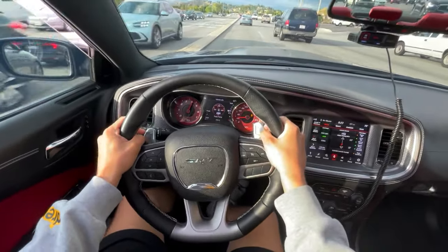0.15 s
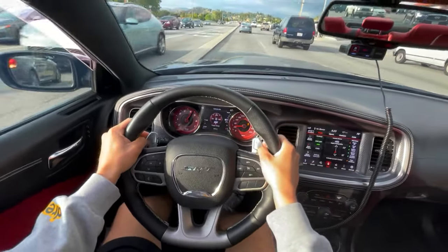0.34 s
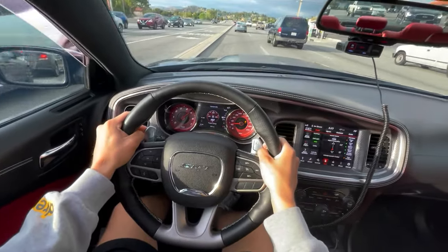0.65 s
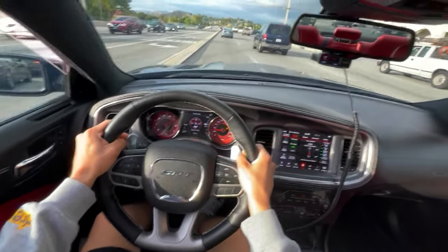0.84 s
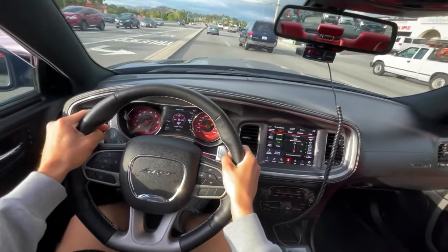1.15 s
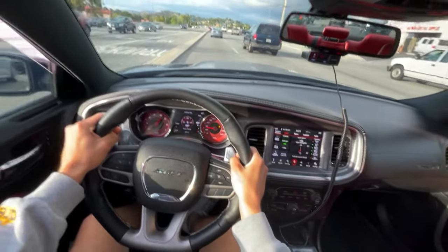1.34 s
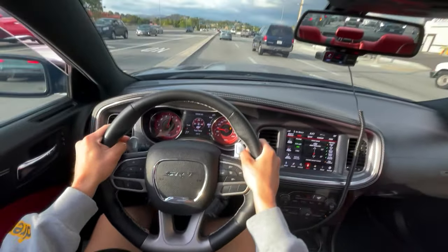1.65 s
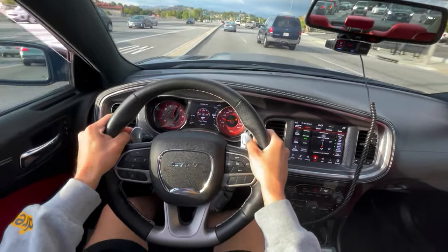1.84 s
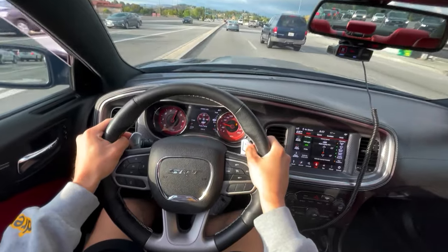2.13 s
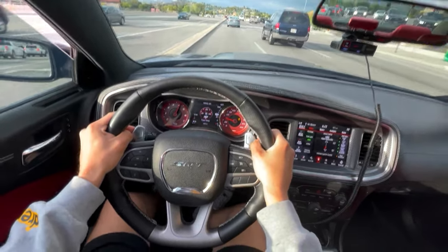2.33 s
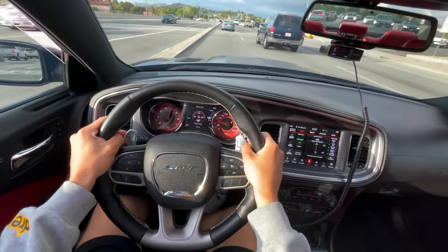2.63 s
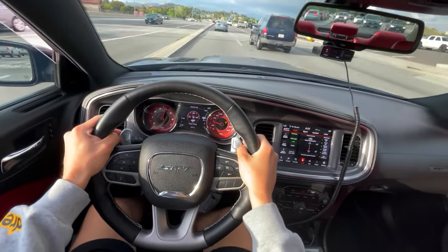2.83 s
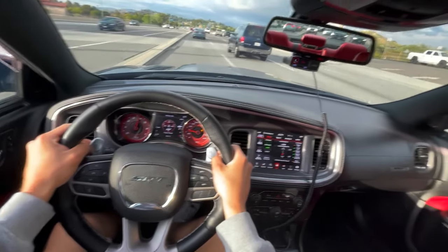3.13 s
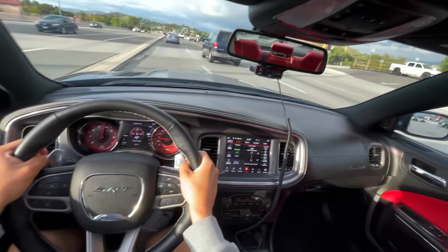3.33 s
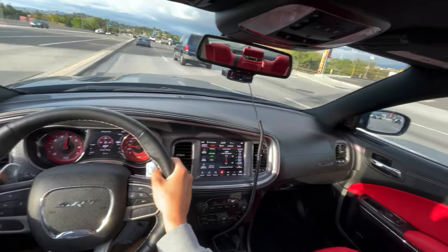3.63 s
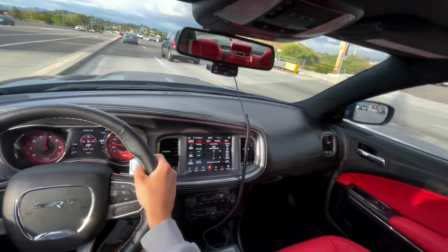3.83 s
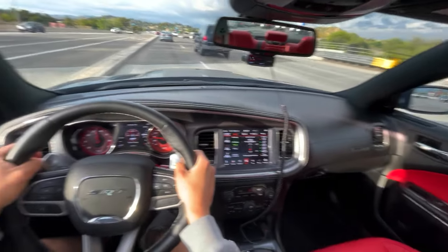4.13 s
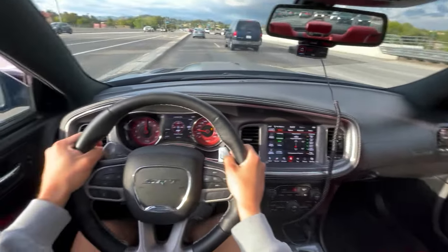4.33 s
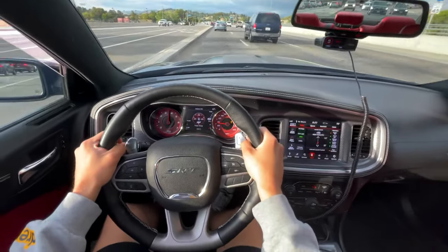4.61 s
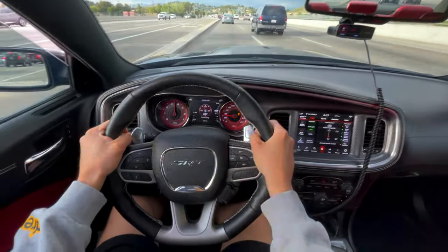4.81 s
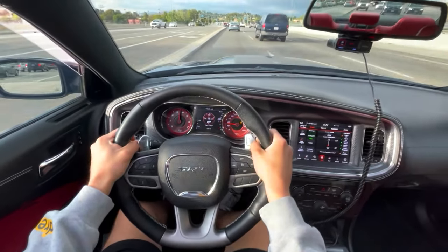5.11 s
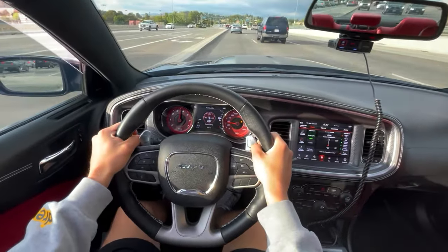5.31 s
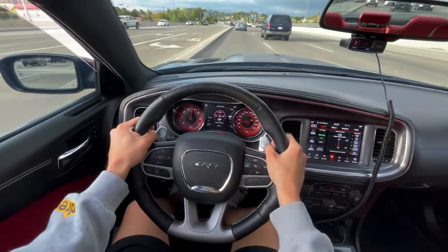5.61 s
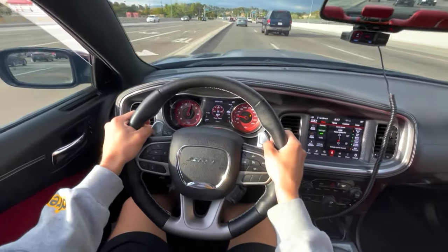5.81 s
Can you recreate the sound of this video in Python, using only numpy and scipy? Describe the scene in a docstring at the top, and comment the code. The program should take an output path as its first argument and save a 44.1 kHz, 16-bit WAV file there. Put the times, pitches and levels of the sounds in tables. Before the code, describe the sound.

In a closed car cabin, with a stereo microphone near the driver, a supercharged V8 is already pulling hard. From 0 to about 1.05 s its coarse, uneven exhaust snarl rises in pitch, with turbulent rasp, hiss and a singing blower whine; a short hollow intake howl swells near 0.9 s. At about 1.2 s the upshift brings a deep thump and spitting bark, and engine and whine slide down until about 1.45 s. The pull resumes briefly, peaking near 1.75 s, then whine and rasp fade away by 2 s. From 2 to 4.6 s a low light-throttle drone slowly sinks over tyre rumble and faint wind, with dull bumps around 2.1-2.3 and 4.2-4.3 s. A heavier jolt comes at 4.7 s. At 5 s there is a dull knock; growl, rasp and a prominent piercing whine build and climb to the end, with tiny trim ticks.

```python
"""A snarling full-throttle pull inside a supercharged V8 saloon, then an upshift with an exhaust bark,
a light-throttle cruise over a few bumps, and a second pull. The exhaust is a harmonic series on the
engine cycle; the blower whines through duct resonances at a fixed multiple of that cycle, except just
after the upshift, when its rotors run at their own speed. Filtered noise gives the gas flow, tyres,
wind and door seals; bumps are short bursts of low tone. A cabin field sets left against right."""
import sys
import numpy as np
from scipy import signal
from scipy.fft import rfft, irfft, next_fast_len
from scipy.io import wavfile

SR = 44100
rng = np.random.default_rng(int(sys.argv[2]) if len(sys.argv) > 2 else 0)


def generate_wav(signal):
    """Clip the signal to [-1, 1] and save it as 16-bit WAV at the path in sys.argv[1]."""
    frames = np.transpose(np.atleast_2d(signal))
    scaled = np.clip(frames, -1, 1) * 32767
    pcm = np.round(scaled).astype(np.int16)
    wavfile.write(sys.argv[1], SR, pcm)


N = 262831  # samples

# cabin field: (frequency [Hz], left leads by [rad], left minus right [dB], likeness of the sides [0-1])
CABIN_FIELD = [(30, 0.5, 2.5, 1), (135, 0.36, 1, 0.82), (175, 0.34, 4, 0.85), (218.5, -0.5, -5.5, 0.79),
               (248.9, 3.5, 5, 0.5), (299.4, -0.04, -1, 0.06), (366, 3.5, -8.5, 0), (406.5, 3, -4.5, 0.6),
               (431, 3.5, -3, 0.59), (487, 4.5, 6.5, 0.34), (520, 3.5, 0.5, 0.1), (578, 4, -2, 0.94),
               (635, 3, 1, 0.3), (697, 4, -1.5, 0.65), (766, 2.5, 7.5, 0.75), (888, 3, 1, 0.62),
               (896, 2.5, 4.5, 0.71), (1086, 3, 2, 0.87), (1203, 4, -4.5, 0.64), (1555, 4, 4.5, 0.69),
               (2130, 0.25, 2, 0.1), (2590, 5, 6, 0.2), (2856, 4, -5.5, 0.6), (2682, 7, -0.5, 0.8),
               (3420, 1.9, 3, 0.11), (4360, 0.5, -1, 0.3), (4630, -2, 0.5, 0.3), (5470, -2, -6, 0.6),
               (5460, -4.5, 6.5, 0.2), (6200, -5.5, -6.5, 0.6), (7400, -8.5, 1, 0.1), (8900, -7, -0.5, 1),
               (10800, -1.5, -1, 0.94)]
# spectrum of the rasping exhaust turbulence: (frequency [Hz], relative density [dB])
RASP_SPECTRUM = [(120, -26.5), (260, 11.5), (335, 3), (430, 13.5), (520, -12), (640, 1.5), (800, 10),
                 (1000, 0.5), (1300, -4), (1600, -8.5), (2100, -14.5), (2900, -16.5), (5000, -31),
                 (10000, -77)]
# spectrum of the hissing turbulence: (frequency [Hz], relative density [dB])
HISS_SPECTRUM = [(800, -32.5), (2000, -13), (3200, -3.5), (4400, -4.5), (5600, -2.5), (7200, -7.5),
                 (9000, -6.5), (10000, -11)]
SIDES = np.array([[.5], [-.5]])  # each side takes half of a left-right difference
REFERENCE_SPEED = 34  # engine cycles per s


def from_db(db):
    """Decibels are logarithmic: 20 dB is a tenfold amplitude gain."""
    return 10 ** (np.asarray(db) / 20)


def rms_one(x):
    """Normalise the mean power to 1."""
    return x / np.sqrt(np.mean(x ** 2) + 1e-20)


def in_time(rows):
    """Linear interpolation of each column of a time curve at every sample."""
    seconds, *columns = np.transpose(rows)
    t = np.arange(N) / SR
    return [np.interp(t, seconds, column) for column in columns]


def at_hz(rows, hz):
    """Interpolation of each column of a frequency table on a logarithmic pitch axis."""
    points, *columns = np.transpose(rows)
    log_hz = np.log(hz + 1e-9)
    return [np.interp(log_hz, np.log(points), column) for column in columns]


def drift(rate):
    """Low-passed noise of rms 1: a random modulator whose spectrum is halved in amplitude at rate [Hz]."""
    t = np.arange(0, N, 32) / SR
    size = 2 * len(t)
    hz = np.fft.rfftfreq(size, t[1])
    spectrum = rfft(rng.standard_normal(size)) / (1 + (hz / rate) ** 4)
    slow = irfft(spectrum)[:len(t)]
    return np.interp(np.arange(N) / SR, t, rms_one(slow))


def swell(centre, half_length):
    """Gaussian envelope of height 1; half_length [s] is its standard deviation."""
    distance = (np.arange(N) / SR - centre) / half_length
    return np.exp(-.5 * np.minimum(distance ** 2, 100))


def noise(colour, white=None):
    """Partly coherent stereo noise: a common row and two independent rows, coloured, with rms 1."""
    size = next_fast_len(N, True)
    hz = np.fft.rfftfreq(size, 1 / SR)
    lead, balance_db, alike = at_hz(CABIN_FIELD, hz)
    alike = np.clip(alike, 0, 1)
    white = rfft(rng.standard_normal((3, N)) if white is None else white, size)
    common = np.sqrt(alike) * white[0] * np.exp(1j * SIDES * lead)
    separate = np.sqrt(1 - alike) * white[1:]
    gain = from_db(at_hz(colour, hz)[0] + SIDES * balance_db)
    return rms_one(irfft((common + separate) * gain, size)[:, :N])


def partial(order, cycles, speed, extra_lead=0):
    """One harmonic of a rotation, of rms 1 before the cabin's left-right balance; extra_lead in rad."""
    lead, balance_db, _ = at_hz(CABIN_FIELD, order * speed)
    phase = 2 * np.pi * (order * cycles + rng.random())
    angle = phase + SIDES * (lead + extra_lead)
    return np.sqrt(2) * from_db(SIDES * balance_db) * np.sin(angle)


def cyclic_noise(cycles, memory, size=1024):
    """Cyclostationary noise over crank angle: recursion makes each cycle partly repeat the one before."""
    warm_up = 10  # cycles discarded while the recursion settles
    fresh = rng.standard_normal((3, int(cycles[-1]) + warm_up + 2, size))
    alike = signal.lfilter([1], [1, -memory], fresh, axis=1)
    rows = alike[:, warm_up:].reshape(3, -1)
    return np.array([np.interp(cycles * size, np.arange(len(row)), row) for row in rows])


def resonance_db(modes, hz):
    """Resonance: each mode lifts or lowers a tone by a bell-shaped (Lorentzian) number of dB."""
    grid = np.linspace(hz.min(), hz.max(), 1000)
    lift_db = sum(db / (1 + ((grid - centre) / width) ** 2) for centre, width, db in modes)
    return np.interp(hz, grid, lift_db)


def boosted_db(law, speed):
    """Flow noise follows a power law: its level grows with boost and with the octaves of engine speed."""
    # blower boost: (time [s], level relative to full boost [dB])
    boost = [(0, -9), (.19, -2.5), (.5, -7), (.82, -2.5), (.97, -10), (1.15, -12), (1.36, -15), (1.56, -14),
             (1.73, -7.5), (1.83, -14), (1.96, -25), (4.6, -37.5), (4.9, -14), (5.25, -6), (5.42, -3),
             (5.75, -3), (5.96, -5.5)]
    full_db, follows, db_per_octave = law
    return full_db + follows * in_time(boost)[0] + db_per_octave * np.log2(speed / REFERENCE_SPEED)


def road(tick_db=-8, tick_length=0.009):
    """Broadband excitation of tyres, wind and seals, with low resonances of the body and ticks of the trim."""
    # tyre rumble on the changing road surface: (time [s], level [dB])
    tyre_level = [(0, -21.5), (.9, -25), (1.4, -22), (2, -20.5), (2.4, -22), (3, -24.5), (4.05, -22.5),
                  (4.2, -25), (4.5, -23.5), (4.6, -23.5), (5, -20), (5.96, -18.5)]
    # wind over the body: (time [s], level [dB])
    wind_level = [(0, -22), (2, -32.5), (2.4, -31), (3.0, -33), (3.4, -32.5), (4.3, -34.5), (5.96, -27)]
    # air sizzling round the door seals: (time [s], level [dB])
    seal_level = [(0, -77), (2, -50.5), (2.9, -45.5), (3.5, -51), (4.1, -45), (4.22, -41.5), (4.45, -40.5),
                  (4.62, -42), (4.9, -39.5), (5.96, -36)]
    # spectra of tyres, wind, seals, body heave and ticks: (frequency [Hz], relative density [dB])
    tyre_colour = [(25, -27.5), (48, -19), (64, -5.5), (135, -0.5), (200, -9.5), (270, -11.5), (350, -17.5),
                   (600, -45), (1500, -84.5)]
    wind_colour = [(150, -35), (350, 6), (480, 7.5), (620, -2), (800, 0), (980, 2.5), (1100, -4.5),
                   (1500, -11), (1780, -13), (2100, -15.5), (2400, -20), (2800, -23.5), (4100, -25.5),
                   (7000, -36.5), (9500, -36.5)]
    seal_colour = [(400, -22.5), (1500, 2.5), (3000, -12), (4500, -13), (7000, -19), (9500, -21)]
    heave_colour = [(15, -25.5), (28, -18.5), (40, 5.5), (52, 6), (70, -9), (200, -74)]
    tick_colour = [(700, -10), (2500, -3.5), (5500, 7.5), (7500, 3.5), (9000, 8), (10500, -9)]
    # jolts that heave the body on its springs: (time [s], level at the height [dB rms], half length [s])
    jolts = [(0.232, -31, 0.034), (1.206, -27, 0.016), (2.3, -39, 0.054), (4.447, -23.5, 0.09),
             (4.705, -18, 0.055), (5.25, -23, 0.021)]
    # the body booms over bumps: (time [s], frequency [Hz], peak level [dB], half length [s])
    bump_rows = [(1.789, 95, -16, 0.022), (2.125, 86.4, -12.5, 0.03), (2.292, 86, -5.5, 0.0071),
                 (4.163, 102, -4.5, 0.0035), (4.241, 121.5, -11, 0.05), (4.312, 73, -10.5, 0.0096),
                 (4.712, 129, -7, 0.005)]
    # trim ticks: (time [s], level before tick_db is added [dB])
    tick_rows = [(0.1894, -31.5), (2.2424, -39.5), (2.4094, -45), (4.2118, -42.5), (5.109, -29),
                 (5.3143, -33), (5.5364, -33)]

    t = np.arange(N) / SR
    beds = [(tyre_level, tyre_colour), (wind_level, wind_colour), (seal_level, seal_colour)]
    rush = sum(from_db(in_time(level)[0]) * noise(colour) for level, colour in beds)
    sway = from_db(-33.5 + 2 * drift(2.6))  # present throughout, wandering by 2 dB
    heave = sway + sum(from_db(db) * swell(s, length) for s, db, length in jolts)
    bumps = sum(from_db(db) * swell(s, length) * np.cos(2 * np.pi * hz * (t - s))
                for s, hz, db, length in bump_rows)
    ticks = sum(from_db(db + tick_db) * swell(s, tick_length) for s, db in tick_rows)
    return rush + heave * noise(heave_colour) + bumps + ticks * noise(tick_colour)


def knock(db=-23, half_length=0.0036):
    """Impact as a brief burst of low-weighted noise: a dull knock as the throttle opens again."""
    # spectrum of the knock: (frequency [Hz], relative density [dB])
    knock_colour = [(150, -13), (400, -1), (830, -1), (1100, -14), (3000, -36), (8000, -53)]
    return from_db(db) * swell(5.023, half_length) * noise(knock_colour)


def gas_flow(cycles, rasp_db, hiss_db, pulsing=0.17, lope=0.13, beat=0.074):
    """Amplitude modulation of turbulence: exhaust and intake puff at each firing, uneven over the cycle."""
    # howls of the intake: (time [s], level at the height before puffing [dB rms], half length [s])
    howls = [(0.47, -22.5, 0.063), (0.912, -15.5, 0.045)]
    # spectrum of the howl: (frequency [Hz], relative density [dB])
    howl_colour = [(600, -43), (860, -21), (935, 16), (990, 19.5), (1060, -10), (1200, -17), (1500, -62)]

    firing = np.cos(16 * np.pi * cycles)  # eight per cycle
    bank = np.cos(4 * np.pi * cycles)  # two per cycle
    once = np.cos(2 * np.pi * cycles)
    puffs = rms_one(1 + pulsing * firing + lope * bank + beat * once)
    rasp = from_db(rasp_db) * noise(RASP_SPECTRUM, cyclic_noise(cycles, memory=.65))
    howling = sum(from_db(db) * swell(s, length) for s, db, length in howls)
    howl = howling * noise(howl_colour, cyclic_noise(cycles, memory=.8))
    hiss = from_db(hiss_db) * noise(HISS_SPECTRUM)
    return puffs * (rasp + howl + hiss)


def blower(cycles, speed, shake=0.09, flutter=0.21, slip_cycles=0.00026, slip_power=4):
    """Periodic chopping of the intake air by rotor lobes: harmonics swept through duct resonances."""
    # after the upshift the rotors turn at a speed of their own until the crank catches them:
    # (time [s], rotor speed [engine cycles per s])
    overrun = [(1.18, 44.3), (1.27, 40.3), (1.42, 35.4), (1.52, 32.7), (1.57, 32.0), (1.61, 34.5),
               (1.64, 34.75), (1.69, 33.9), (1.76, 34.93)]
    # strength of the whine: (time [s], relative level [dB])
    whine_level = [(0, -8.5), (.1, -9.5), (.5, -12), (.78, -10), (.95, -21), (1.15, -25), (1.3, -20),
                   (1.45, -14), (1.57, -17), (1.71, -10), (1.79, -14), (1.86, -40), (4.75, -35),
                   (4.93, -19), (5.2, -12), (5.45, -2), (5.8, -2.8), (5.96, -3.5)]
    # relative levels of the whine's harmonics, from the first up: [dB]
    harmonics_db = [-15, -30, -35, -38, -40, -44, -47, -50.5, -54, -54.5, -51, -51]
    # duct resonances and gaps: (frequency [Hz], half width [Hz], lift [dB])
    duct_modes = [(680, 14, 13), (715, 14, -6), (810, 25, 3), (910, 14, -13.5), (1522, 14, 11.5),
                  (1595, 14, 3), (1650, 11, -9), (1800, 40, -10.5), (1884, 178, -15), (2076, 18, 20),
                  (2280, 25, 4), (2425, 25, 7), (2580, 39, -15), (2890, 50, 6), (3020, 14, -9),
                  (3250, 50, 5), (3450, 140, -6), (3780, 25, -8.5), (3930, 48, 3.5), (4220, 30, 1),
                  (4970, 50, 5), (4530, 50, 3), (4770, 70, 6.5), (5670, 24, -10.5), (5980, 60, 6),
                  (7580, 70, 5)]
    lobes_per_cycle = 23.33  # per cycle of rotor speed
    side_line_db, fade_db = -27, 2.8  # relative level of the side line; spread of the harmonics' fading
    lead_scatter = .22  # rad, spread of each harmonic's left-right phase

    t = np.arange(N) / SR
    freewheeling = (t > overrun[0][0]) & (t < overrun[-1][0])
    rotor_speed = np.where(freewheeling, in_time(overrun)[0], speed)
    # angular jitter grows steeply with revs and frays the tones
    slip = slip_cycles * (speed / REFERENCE_SPEED) ** slip_power * drift(45)
    rotor = np.cumsum(rotor_speed) / SR + slip
    whine_db, = in_time(whine_level)

    # the engine's strokes add a side line one order under the whine
    side = lobes_per_cycle - 1
    side_db = whine_db + side_line_db + resonance_db(duct_modes, side * rotor_speed)
    tone = from_db(side_db) * partial(side, rotor, rotor_speed)
    for k, harmonic_db in enumerate(harmonics_db, 1):
        order = k * lobes_per_cycle
        duct_db = resonance_db(duct_modes, order * rotor_speed)
        db = whine_db + harmonic_db + duct_db + fade_db * drift(19)
        tone += from_db(db) * partial(order, rotor, rotor_speed, lead_scatter * drift(14.0))
    strokes = np.sin(2 * np.pi * cycles) + np.sin(4 * np.pi * cycles + 1)
    return tone * (1 + shake * strokes + flutter * drift(51))


def shift_bark(cycles, speed, thump_db=-7, crackle_db=-21, spit_db=-39, thump_length=0.025, half_length=0.052):
    """Transient excitation of the pipes: the spark is cut, they thump and unburnt charge spits in them."""
    shift_s = 1.235  # moment of the upshift
    # order 2.11 lies close to the bank rate of two per cycle
    thump = from_db(thump_db) * swell(shift_s, thump_length) * partial(2.11, cycles, speed)
    spit = from_db(crackle_db) * noise(RASP_SPECTRUM) + from_db(spit_db) * noise(HISS_SPECTRUM)
    return thump + swell(shift_s, half_length) * spit


def growl(cycles, speed, throttle):
    """Fourier series of uneven exhaust pulses: the order pattern changes with throttle and revs."""
    # strength of the pulses: (time [s], deep drone [dB], snarling upper orders [dB]), both relative
    load = [(0.0, 0.3, -1), (0.25, -0.6, 5), (0.55, 0, 4.3), (0.88, -3.5, -0.5), (1.15, -5, -10.5),
            (1.35, -7, -9), (1.55, -6.5, -14), (1.78, -7, -3), (1.98, -8.5, -11), (2.25, -3, -13),
            (2.45, -2.5, -5), (3.0, 1.5, -10.7), (3.5, -3.3, -10.5), (4.2, -1.5, -5), (4.65, -5, -18.5),
            (4.92, -1.5, -11), (5.3, -2.3, -10.5), (5.65, -0.6, -1.5), (5.96, -3.5, 1.3)]
    # uneven firing of the two banks: (order, pulling at low revs [dB], pulling at high revs [dB],
    # on a light throttle [dB]), all relative levels
    order_rows = [(1.0, -36.5, -38, -39.5), (2.0, -28.5, -13.5, -23.5), (3.0, -25.7, -24.5, -26.5),
                  (4.0, -28.5, -26.5, -29), (5.0, -28, -30.5, -29), (6.0, -22, -29, -32.5),
                  (7.0, -34, -33, -34.5), (8.0, -18.5, -17.5, -27.5), (9.0, -25.5, -24.5, -48.5),
                  (10.0, -33.5, -24, -30.5), (11.0, -40.5, -32.5, -33.5), (12.0, -31.5, -35.5, -40),
                  (13.0, -32, -36, -38.5), (14.0, -26, -25, -33), (15.0, -38.5, -40.5, -33),
                  (16.0, -29, -34, -43.5), (17.0, -27, -34.5, -38), (18.0, -27, -36, -35.5),
                  (19.0, -34, -52.5, -42), (20.0, -28, -40, -36.5), (21.0, -27, -37, -49),
                  (22.0, -48.5, -37, -48), (23.0, -42, -35.7, -43), (24.0, -44.5, -51.2, -53),
                  (25.0, -27, -41.5, -53), (26.0, -37, -45, -67.5), (27.0, -52, -53.9, -57),
                  (28.0, -37.5, -40.5, -64), (29.0, -36, -40, -53), (30.0, -57, -40, -52.5),
                  (31.0, -52.5, -40.5, -61), (32.0, -59, -49, -67), (33.0, -58, -61, -62),
                  (34.0, -44.5, -56.5, -66), (35.0, -56.5, -52, -43)]
    # orders with a steady left-right phase: (order, extra left lead at closed throttle [rad])
    leading_rows = [(2, 0.065), (6, 0.16), (8, 1.8), (10, 0.18)]
    # air resonances of the cabin: (frequency [Hz], half width [Hz], lift [dB])
    cabin_modes = [(118, 5.4, -3.5), (130, 6.0, 3), (162.8, 3.5, -10), (198, 5.5, 4.5), (218, 5.5, 7),
                   (304.5, 7.1, 3), (324.3, 7.6, -8.5), (352.2, 10.1, 9), (381, 7, -12), (395, 13.4, 4.5),
                   (517, 14, -6.5), (540, 7.6, 4.5), (566, 16, -4), (577, 4.5, -8), (850, 2.6, -4),
                   (924, 12, -12.5), (957, 16.3, 3.5), (1120, 33, 7)]
    exhaust_db = 1  # added to every order
    low_revs, high_revs = 33, 42  # cycles per s
    drone_top_order, snarl_order = 6, 20  # the drone gives way to the snarl between these
    lead_scatter = .15  # rad, spread of the other orders' left-right phase
    sway_db, sway_hz = 1.7, 9  # random swell and sinking of each order

    drone_db, snarl_db = in_time(load)
    revs = np.interp(speed, [low_revs, high_revs], [0, 1])
    leading = dict(leading_rows)
    out = np.zeros((2, N))
    for order, low_db, high_db, light_db in order_rows:
        order = round(order)
        upper = np.interp(order, [drone_top_order, snarl_order], [0, 1])
        pulling_db = (1 - revs) * low_db + revs * high_db
        pattern_db = throttle * pulling_db + (1 - throttle) * light_db
        load_db = (1 - upper) * drone_db + upper * snarl_db
        db = exhaust_db + pattern_db + load_db + resonance_db(cabin_modes, order * speed)
        if order in leading:
            extra_lead = (1 - throttle) * leading[order]
        else:
            extra_lead = lead_scatter * drift(6.1)
        out += from_db(db + sway_db * drift(sway_hz)) * partial(order, cycles, speed, extra_lead)
    return out


def scene():
    """Superposition: the crank's speed drives exhaust, gas flow and blower, over the sounds of the road."""
    # mean engine speed: (time [s], four-stroke cycles per second [1/s])
    mean_speed = [(0.0, 34.58), (0.2, 36.25), (0.39, 37.75), (0.5, 39.26), (0.8, 42.5), (0.95, 44.2),
                  (1.04, 44.9), (1.18, 44.3), (1.22, 40.6), (1.3, 35.5), (1.45, 32.3), (1.57, 33.8),
                  (1.78, 35.05), (2.06, 33.1), (2.25, 33.9), (2.45, 33.3), (2.65, 33.25), (2.95, 32.5),
                  (3.42, 30.55), (3.8, 30.05), (4.3, 29.85), (4.68, 29.45), (4.9, 30.15), (5.1, 30.38),
                  (5.28, 31.05), (5.52, 32.72), (5.62, 32.95), (5.96, 35.12)]
    # pedal: (time [s], throttle opening [0-1])
    pedal = [(0, 0.92), (1.8, 0.96), (2.1, 0.16), (2.5, 0.39), (3.05, 0.34), (3.3, 0.1), (4.65, 0.05),
             (4.92, 1), (5.96, 1)]
    # laws of rasp and hiss: (level at full boost and reference speed [dB], share of the boost's swing,
    # growth with engine speed [dB per octave])
    rasp_law = (-21, 1, 23)
    hiss_law = (-39.5, 1, 13.3)

    unsteadiness = .0006 * drift(18)  # share of the crank's speed
    speed = in_time(mean_speed)[0] * (1 + unsteadiness)
    cycles = np.cumsum(speed) / SR
    throttle = np.clip(in_time(pedal)[0], 0, 1)

    background = road() + knock()
    flow = gas_flow(cycles, boosted_db(rasp_law, speed), boosted_db(hiss_law, speed))
    # the blower leaves the crank's speed just after the upshift
    whine = blower(cycles, speed)
    exhaust = shift_bark(cycles, speed) + growl(cycles, speed, throttle)
    return background + flow + whine + exhaust


def record(dry):
    """Band limiting and soft saturation: the deepest bass and the top are cut, high peaks are rounded."""
    low_cut = signal.butter(2, 22, "high", fs=SR, output="sos")
    top_cut = signal.ellip(8, .3, 48, 10200, fs=SR, output="sos")
    bass_cut = signal.sosfilt(low_cut, dry)
    rounded = bass_cut / (1 + (bass_cut / .95) ** 8) ** (1 / 8)
    return signal.sosfilt(top_cut, rounded)


dry = scene()
out = record(dry)
generate_wav(out)
```